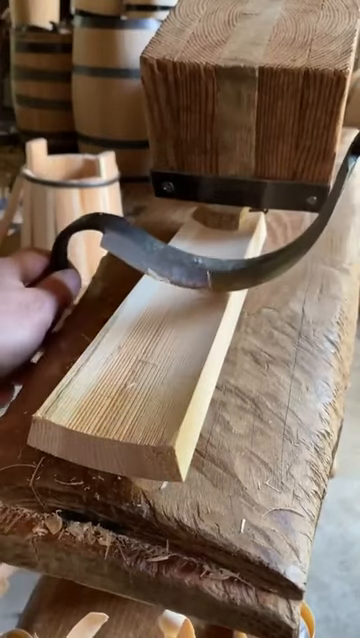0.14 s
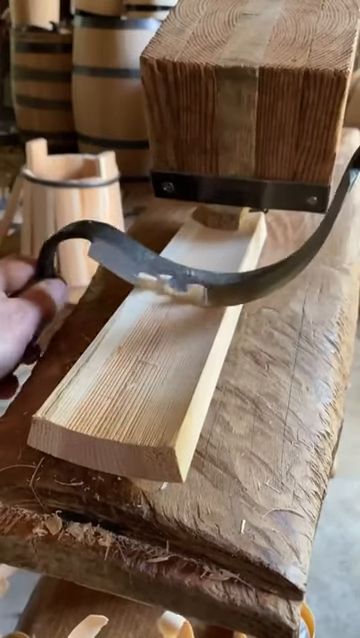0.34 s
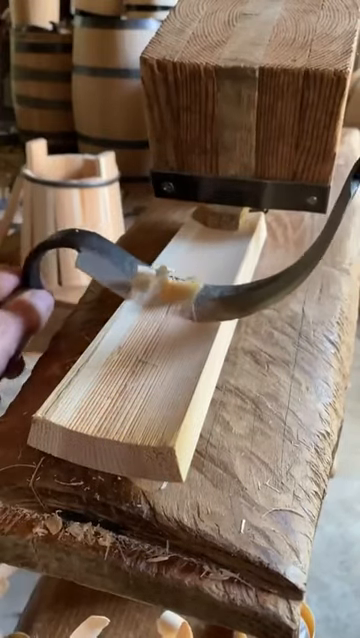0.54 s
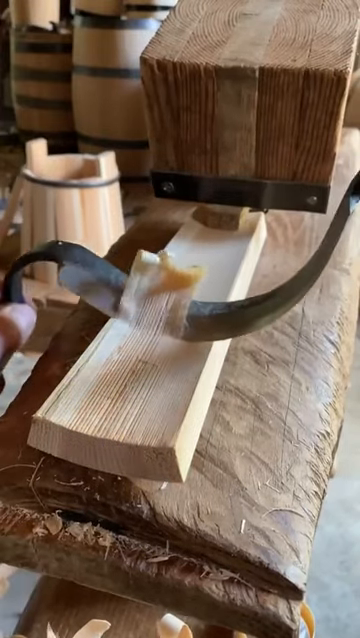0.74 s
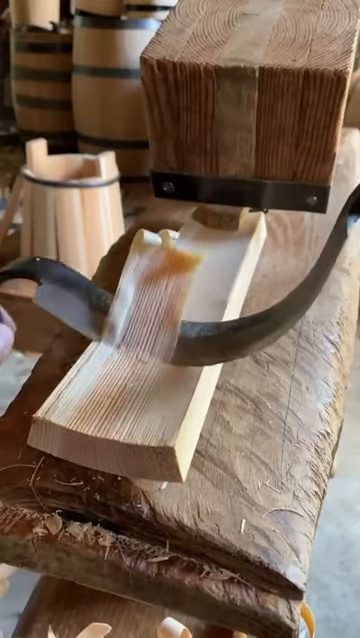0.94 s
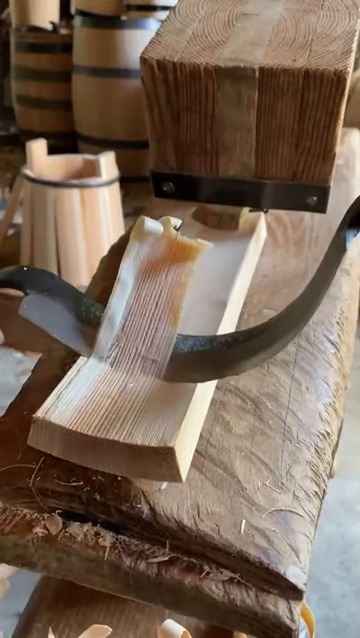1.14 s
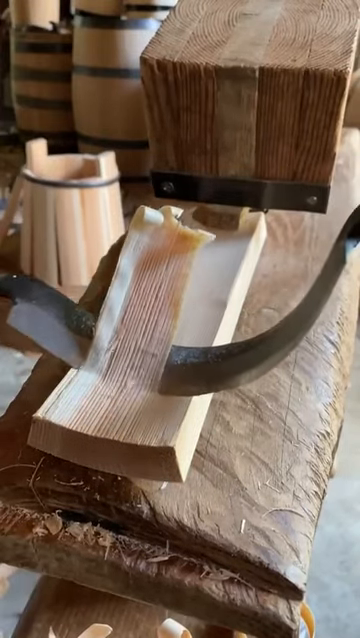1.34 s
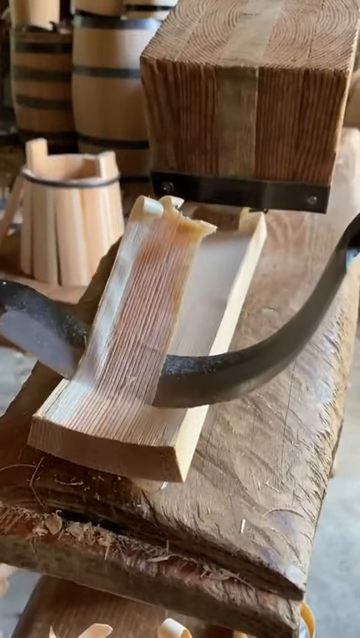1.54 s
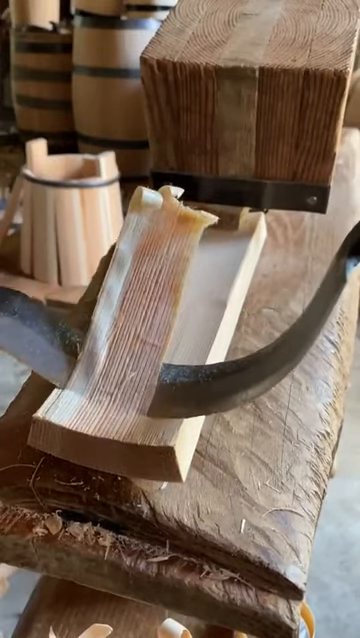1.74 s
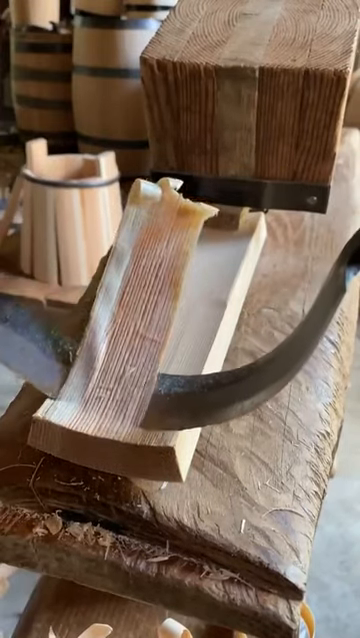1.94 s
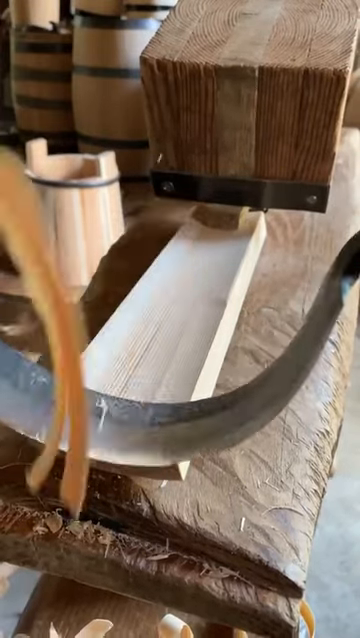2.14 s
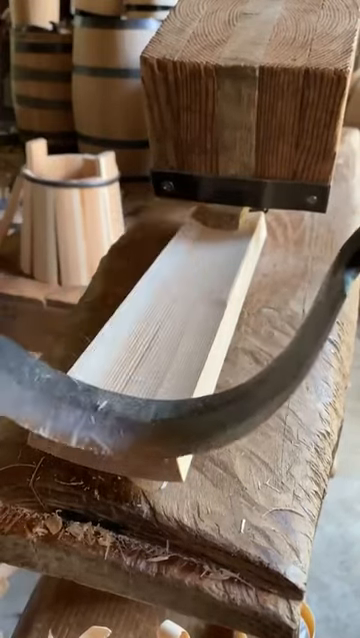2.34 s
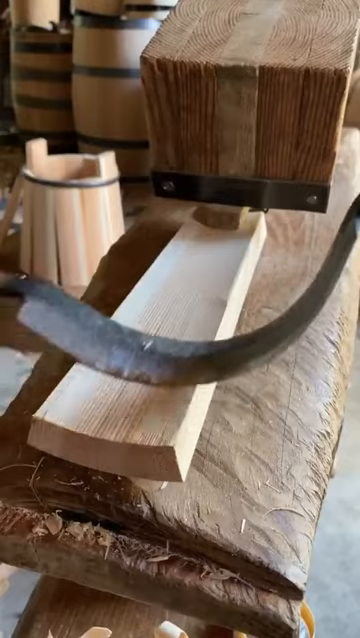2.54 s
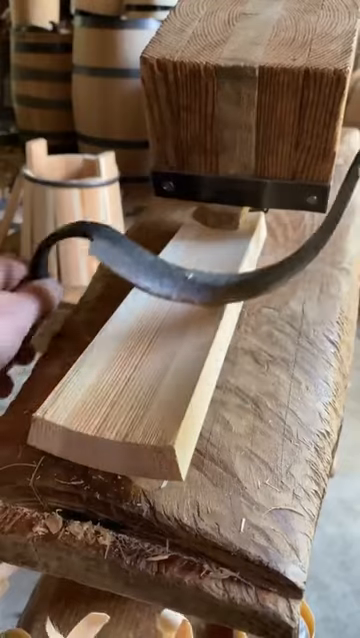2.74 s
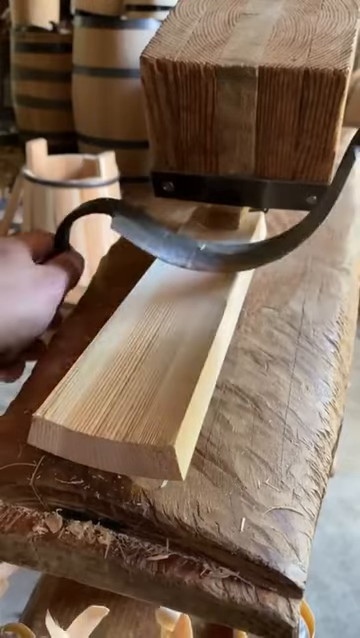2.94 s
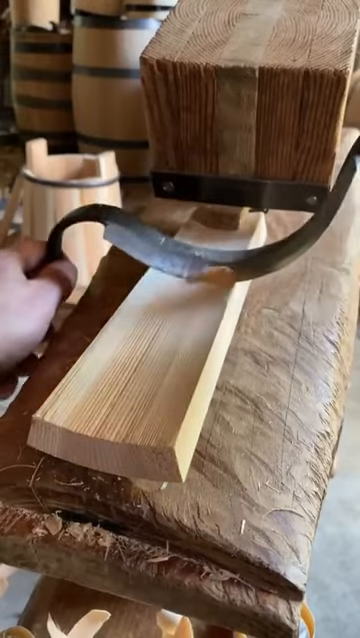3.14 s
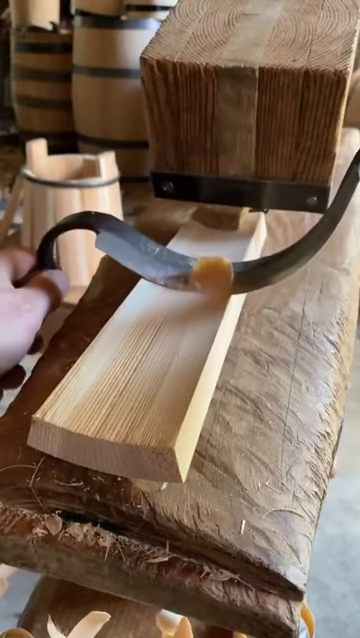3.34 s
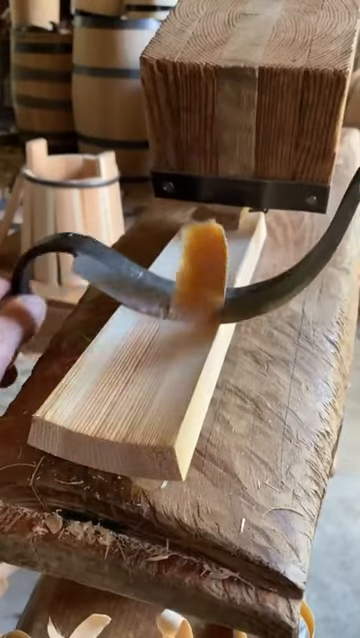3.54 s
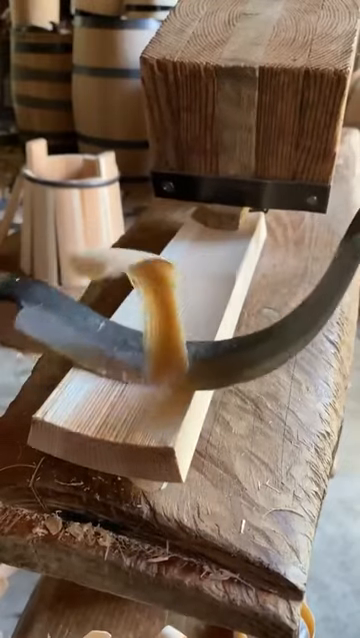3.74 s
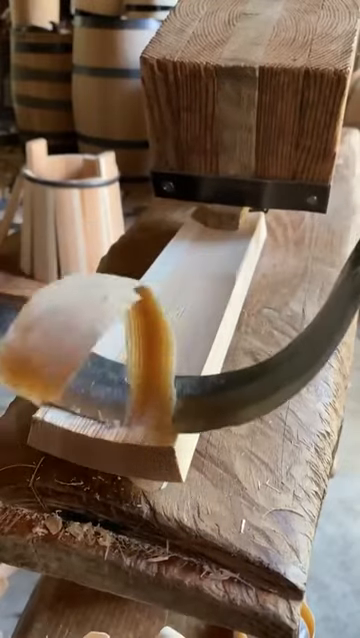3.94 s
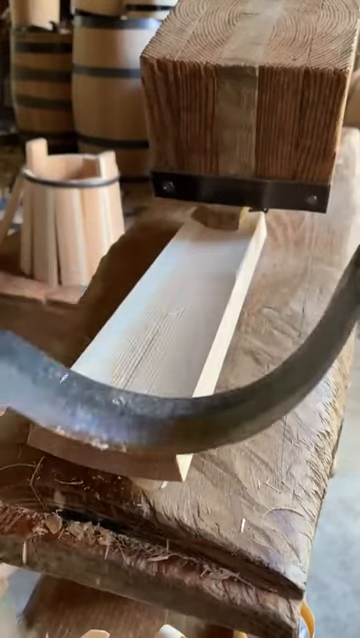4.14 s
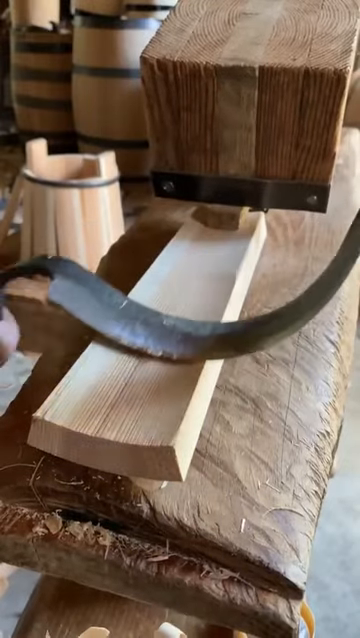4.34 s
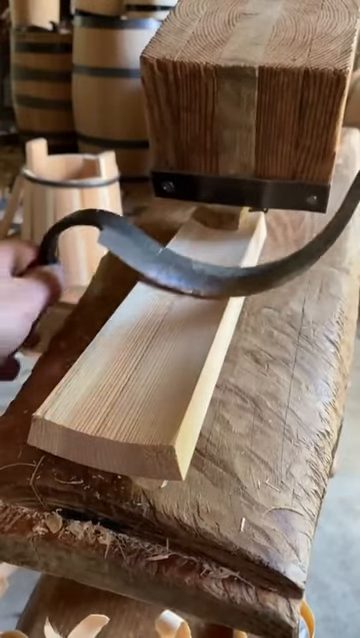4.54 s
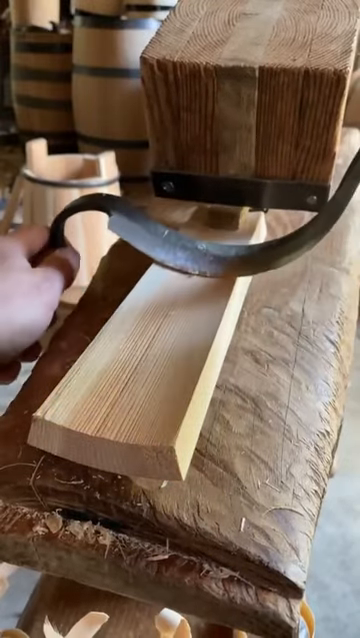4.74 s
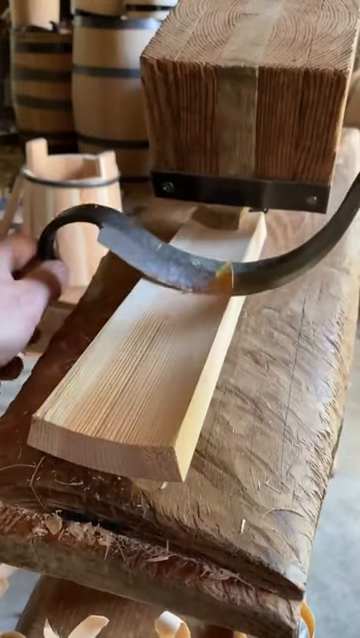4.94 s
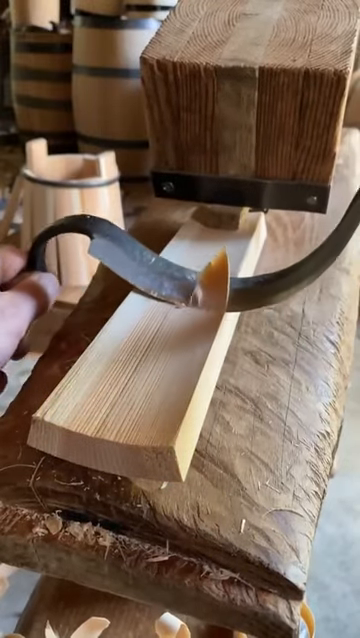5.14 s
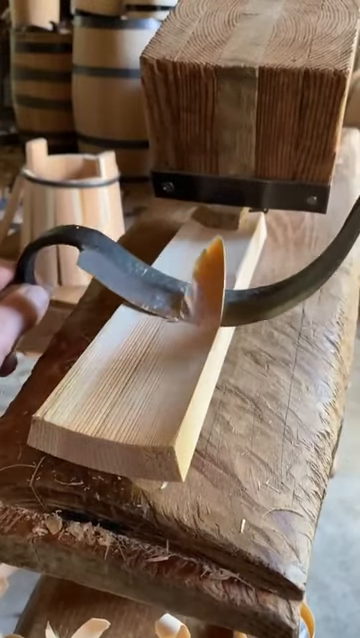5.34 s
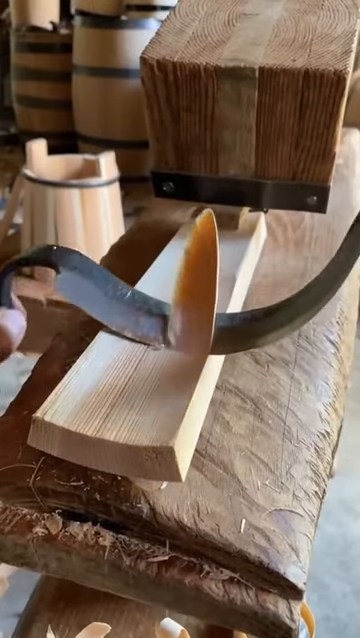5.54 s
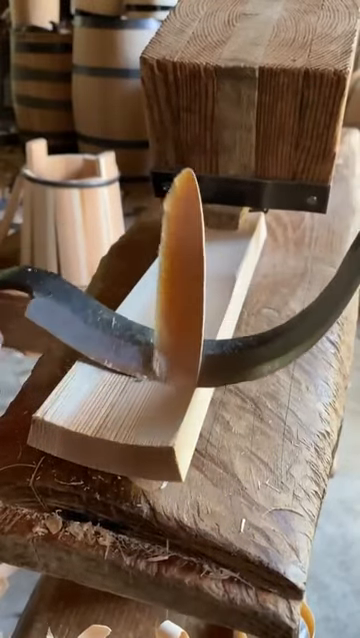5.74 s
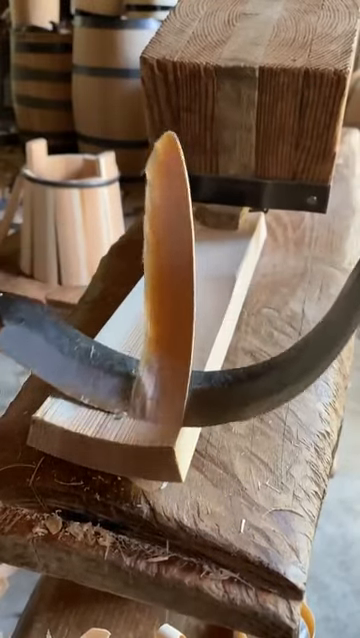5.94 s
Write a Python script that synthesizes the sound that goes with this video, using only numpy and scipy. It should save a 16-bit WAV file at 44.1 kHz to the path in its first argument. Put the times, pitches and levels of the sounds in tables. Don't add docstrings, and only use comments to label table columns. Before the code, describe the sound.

A drawknife pulls three strokes on a board: dry tearing hiss, singing steel and low wooden drone, with knocks as the blade slides back.

```python
import sys
import numpy as np
from scipy import signal
from scipy.fft import rfft, irfft, next_fast_len
from scipy.io import wavfile
from scipy.ndimage import uniform_filter1d

SR = 44100
rng = np.random.default_rng(int(sys.argv[2]) if len(sys.argv) > 2 else 0)


def boost(x):
    u = np.asarray(x, float) / 20
    return 10 ** u


def dump_mix(stems):
    frames = np.atleast_2d(stems).T
    limited = np.clip(frames, -1, 1)
    pcm = np.round(limited * 32767).astype(np.int16)
    wavfile.write(sys.argv[1], SR, pcm)


N = 264159
WIDE = next_fast_len(N, real=True)
TIME = np.arange(N) / SR


def evened(x):
    return x / np.sqrt(np.mean(x ** 2) + 1e-20)


def noise_pair():
    return rng.standard_normal((2, N))


def highpass(x, hz, order):
    return signal.sosfilt(signal.butter(order, hz, "high", fs=SR, output="sos"), x)


def read(points, column=1):
    table, hz = np.transpose(points), np.fft.rfftfreq(WIDE, 1 / SR)
    return np.interp(np.log(hz + 1), np.log(table[0] + 1), table[column])


def colour(x, points):
    hz = np.fft.rfftfreq(WIDE, 1 / SR)
    inside = (hz >= points[0][0]) & (hz <= points[-1][0])
    return evened(irfft(rfft(x, WIDE) * boost(read(points)) * inside, WIDE)[:, :N])


def ring(x, modes, bend=0.96):
    out = 0
    for hz, width, db in modes:
        turn = np.exp(2j * np.pi * np.cumsum(hz * bend * np.ones(x.shape[-1])) / SR)
        r = np.exp(-np.pi * width / SR)
        mode = (turn * signal.lfilter([1 - r], [1, -r], x / turn)).real
        out = out + boost(db) * evened(mode)
    return out


def wobble(seconds, depth_db):
    size = max(int(seconds * SR), 2)
    slow = uniform_filter1d(uniform_filter1d(rng.standard_normal(N), size), size)
    return boost(depth_db * evened(slow))


def shape(s, hold, rise_db_s, fall_db_s):
    t = TIME - s
    db = np.minimum(rise_db_s * t, 0) - fall_db_s * np.maximum(t - hold, 0)
    return boost(2 * np.maximum(db, -100))


# f/Hz, level/dB per Hz
BENCH_RUMBLE = [(15, -59), (25, -20.5), (59, 5.5), (82, 1), (97, -5), (124, -2.5), (156, -10), (220, -16.5),
                (290, -10), (480, -120)]
STILL_AIR = [(120, -11.5), (400, 12), (700, 5.5), (1500, 0), (4000, -2), (8000, -32), (16000, -36.5)]


def shop_air(gain):
    rumble = gain["bench"] * wobble(0.076, 1.0) * colour(noise_pair(), BENCH_RUMBLE)
    return rumble + boost(-62.5) * colour(noise_pair(), STILL_AIR)


# f/Hz, t60/s
SHOP_DECAY = [(200, 0.63), (1000, 0.4), (4000, 0.29), (12000, 0.22)]


def echoes(x):
    taps = rng.choice([-1., 1.], (2, SR // 2)) * (rng.random((2, SR // 2)) < .05)
    taps[:, :200] = 0
    hz, t, z = signal.stft(taps, SR, nperseg=256)
    f, t60 = np.transpose(SHOP_DECAY)
    decay = boost(-60 * t / np.interp(hz, f, t60)[:, None])
    tail = signal.istft(z * decay, SR, nperseg=256)[1]
    return signal.fftconvolve(x, tail / np.linalg.norm(tail[0]), axes=1)[:, :N]


# t/s, level/dB
BENCH_SHOVES = [
    (.86, -45),
    (1.16, -51.5),
    (3.51, -46),
    (5.2, -49),
    (5.68, -41.5),
]


def shove_bench(power):
    power["bench"] += boost(2 * -52.5)
    for s, db in BENCH_SHOVES:
        power["bench"] += boost(2 * db) * shape(s, 0, rise_db_s=48, fall_db_s=90)


# t/s, peak level/dB, f/Hz, t60/s
BOARD_KNOCKS = [(0.628, -30.5, 193, 0.12), (0.882, -29, 460, 0.011), (1, -22, 290, 0.0057),
                (2.447, -45.5, 566, 0.12), (2.824, -42, 238, 0.066), (2.844, -44.5, 396, 0.2),
                (4.349, -28.5, 595, 0.013), (4.504, -26.5, 422, 0.055), (4.518, -40, 374, 0.03),
                (4.569, -37.5, 256.6, 0.21), (4.855, -31.5, 405, 0.031), (5.39, -28, 263, 0.026)]
# t/s, peak level/dB, f/Hz, t60/s
BLADE_TAPS = [
    (4.791, -26.5, 2470, 0.0096),
    (0.037, -44.5, 1190, 0.023),
    (2.449, -26.5, 1160, 0.02),
    (2.449, -33, 1750, 0.013),
    (2.456, -30.5, 1470, 0.028),
    (2.546, -42, 1090, 0.022),
    (2.84, -45, 750, 0.076),
    (4.348, -30.5, 1080, 0.01),
]


def knocks():
    out, t = np.zeros(N + 8192), np.arange(8192) / SR
    for s, db, hz, t60 in BOARD_KNOCKS + BLADE_TAPS:
        at = round(s * SR)
        decay = boost(db - 60 * t / max(t60, .01))
        soft_start = 1 - np.exp(-t * hz * 1.8)
        out[at:at + 8192] += 1.34 * decay * soft_start * np.sin(2 * np.pi * hz * t)
    return np.array([out[:N], np.roll(out[:N], 30)])


# t/s, hold/s, rub level/dB, weight level/dB
BLADE_SLIDES = [(0, 0.033, -52, -51.5), (0.122, 0.27, -55, -70), (2.462, 0.094, -48, -56.5),
                (2.63, 0.18, -60.5, -61), (2.826, 0.015, -55.5, -46), (2.868, 0.064, -55, -67),
                (4.348, 0.037, -56, -48.5), (4.414, 0.077, -67, -48), (4.494, 0.064, -57.5, -47),
                (4.605, 0.12, -62, -63.5), (4.798, 0.056, -69, -55.5)]
FROM_RUB = {"hiss": -.5, "blade": -9, "face": -1.9}
FROM_WEIGHT = {"low": -6.5, "upper": -1, "face": -5.5}


def slide_back(power):
    for s, hold, rub_db, weight_db in BLADE_SLIDES:
        slide = shape(s, hold, rise_db_s=800, fall_db_s=170)
        power["bright"] += -13 * boost(2 * (rub_db + FROM_RUB["hiss"])) * slide
        for level_db, law in ((rub_db, FROM_RUB), (weight_db, FROM_WEIGHT)):
            for layer, more_db in law.items():
                power[layer] += boost(2 * (level_db + more_db)) * slide


# t/s, peak level/dB, t60/s, brightness/dB, thud level/dB
SHAVING_TEARS = [
    (2.195, -25.5, 0.17, -1, -54),
    (4.119, -30.5, 0.097, 12.5, -41.5),
]


def tear_off(power):
    rise_db_s, thud_lag_s = 496.5, 0.015
    for s, peak_db, t60, bright_db, thud_db in SHAVING_TEARS:
        tear = shape(s, 0, rise_db_s, 60 / t60)
        thud = shape(s + thud_lag_s, 0, rise_db_s, 60 / t60)
        power["hiss"] += boost(2 * peak_db) * tear
        power["bright"] += bright_db * boost(2 * peak_db) * tear
        power["blade"] += boost(2 * (peak_db - 21)) * tear
        power["face"] += boost(2 * (peak_db - 16)) * thud
        power["low"] += boost(2 * thud_db) * thud


# t/s, peak level/dB, centre f/Hz
FIBRE_SNAPS = [(0.612, -46, 2500), (0.672, -43, 3600), (0.8835, -28.5, 5600), (1, -31, 5240),
               (1.1, -34, 4880), (1.1163, -33.5, 4500), (1.1608, -28.5, 4580), (1.1788, -24.5, 3160),
               (1.3418, -37.5, 2900), (1.5212, -32, 3500), (1.6402, -35.5, 2980), (1.6868, -52, 2650),
               (1.783, -41, 7500), (1.941, -39, 3100), (3.5536, -38.5, 2720), (3.5813, -33, 4950),
               (5.1248, -35, 5800), (5.1743, -34.5, 6100), (5.224, -39, 6100), (5.3592, -39, 6860),
               (5.3759, -33, 5800), (5.3941, -26, 5700), (5.301, -36.5, 3000), (5.51, -40.5, 5240),
               (5.5468, -34, 4100), (5.5657, -40, 3280), (5.602, -34, 5170), (5.622, -37, 5740),
               (5.7393, -31, 6200), (5.8518, -25.5, 6100)]
# t/s, peak level/dB, centre f/Hz
SHAVING_RIPS = [(2.153, -36.5, 5790), (2.1622, -50.5, 5000), (2.174, -25.5, 5770), (2.1817, -13.5, 6100),
                (2.189, -16.5, 4780), (2.201, -21, 5350), (2.2165, -22, 4410), (4.109, -41, 7780),
                (4.115, -26, 5430), (4.117, -15, 7790), (4.1235, -33, 8060), (4.1356, -24, 3416)]
# t/s, peak level/dB, centre f/Hz
STEEL_TICKS = [(0.0368, -41, 3710), (0.0785, -45, 4560), (2.4463, -37.5, 2720), (2.457, -39.5, 2670),
               (2.5257, -44, 3300), (2.5466, -36, 3330), (2.6173, -48.5, 5570), (2.8006, -51, 4930),
               (2.825, -51, 4440), (3.1363, -53, 2350), (4.3504, -43.5, 2850), (4.5326, -53.5, 2520),
               (4.7909, -37, 2440)]


def snaps():
    out, t = np.zeros((2, N + 2048)), np.arange(2048) / SR
    for s, db, hz in FIBRE_SNAPS + SHAVING_RIPS + STEEL_TICKS:
        t60 = 0.017 * np.exp(-0.0746 * (db + 34))
        soft_start = 1 - np.exp(-(t / 0.00031) ** 2)
        burst = rng.standard_normal((2, 2048)) * soft_start * boost(-60 * t / max(t60, .004))
        band = signal.butter(2, [1050, 1.95 * hz + 1500], "band", fs=SR, output="sos")
        broad = signal.sosfilt(band, burst)
        pair = .7 * evened(broad) + ring(burst, [(hz, .4 * hz, 0)])
        pair = highpass(pair, 750, order=3)
        loudest = np.sqrt(uniform_filter1d(pair[0] ** 2, size=100).max())
        at = round((s - .0004) * SR)
        out[:, at:at + 2048] += boost(db + 1.5) * pair / loudest
    return out[:, :N]


# f/Hz, width/Hz, level/dB
BOARD_LOW = [(202, 30, 5.5), (204.7, 55, 6), (238.7, 19, 5.5)]
BOARD_UPPER = [(349, 8.7, 4), (379.6, 7.1, -3), (461, 6.5, -6), (640, 370, 2.5)]


def board(gain):
    chatter = wobble(0.014, 2.2) * noise_pair()
    low = ring(ring(chatter, BOARD_LOW), [(216.4, 83, 0)])
    upper = ring(ring(chatter, BOARD_UPPER), [(370, 380, 0)])
    return gain["low"] * evened(low) + gain["upper"] * evened(upper)


def tearing(per_s, spread_db, burst_s, share):
    strength = boost(spread_db * np.minimum(rng.exponential(1, N), 2.8))
    breaks = (rng.random(N) < per_s / SR) * strength
    bursts = signal.lfilter([1], [1, -np.exp(-1 / (burst_s * SR))], breaks)
    envelope = np.sqrt(1 - share + share * evened(bursts) ** 2)
    return envelope * wobble(0.00377, 0.29) * wobble(0.01, 0.33) * noise_pair()


def patchy(x, depth_db):
    z = signal.stft(x, nperseg=512)[2]
    field = uniform_filter1d(rng.standard_normal(z.shape[1:]), size=3, axis=0)
    field = uniform_filter1d(field, size=16, axis=1)
    return evened(signal.istft(z * boost(depth_db * evened(field)), nperseg=512)[1][:, :N])


# f/Hz, width/Hz, level/dB
SHAVING_NOTES = [(3500, 42, -28.5), (4500, 690, -11.5), (5610, 120, -18), (6100, 490, -6.5), (8190, 73, -5)]
# f/Hz, level/dB per Hz
FIBRE_HISS = [(1000, -14), (1500, -5.5), (2200, -5), (2600, 5.5), (3300, 3.5), (6000, -1), (7500, -3.5),
              (9000, -5), (11000, -15), (12800, -7), (16500, -39)]
BOARD_FACE = [(250, -1.5), (420, 4.5), (521, -18.5), (756, -6.5), (856, 7), (1150, -11), (2000, -5.5),
              (2600, -55.5), (4400, -120)]
BLADE_NOTES = (2284, 2037, 2235, 1780)
# width/Hz, level/dB
BLADE_RING = [(48, 5.5), (60, -1), (70, 3.5), (90, -8)]


def edge(gain):
    drive = tearing(per_s=320, spread_db=5.0, burst_s=.0012, share=0.26)
    hiss = patchy(colour(drive + 0.29 * ring(drive, SHAVING_NOTES), FIBRE_HISS), depth_db=2.8)
    hiss = hiss + (gain["top"] - 1) * highpass(hiss, 7500, order=2)
    notes = [(hz, *how) for hz, how in zip(BLADE_NOTES, BLADE_RING)]
    blade = evened(ring(drive, notes, bend=wobble(.05, .06)))
    face = colour(drive, BOARD_FACE)
    return (boost(-1.0) * gain["hiss"] * hiss + boost(-4.0) * gain["blade"] * blade
            + boost(-6.0) * gain["face"] * face)


def columns(tables):
    bite_s, lift_s, clear_db, unloaded_db = 0.078, 0.051, -26.5, -35
    padded = []
    for c in tables:
        before = np.add(c[0], [-bite_s, clear_db, unloaded_db])
        after = np.add(c[-1], [lift_s, clear_db, clear_db])
        padded.append(np.vstack([before, c, after]))
    s, *cols = np.vstack(padded).T
    return [np.interp(TIME, s, c) for c in cols]


# t/s, speed of the cut level/dB, load of the edge on the board level/dB
PULLS = [
    [(.29, -44, -38.5), (.38, -39.5, -41), (.54, -42, -45.5), (.72, -38.5, -49), (.9, -38, -45.5),
     (1.25, -40.5, -53), (1.7, -44, -64), (1.98, -42, -54), (2.13, -47.5, -65)],
    [(3.16, -53, -43), (3.2, -46, -35), (3.4, -45, -40), (3.52, -41, -42), (3.67, -35.5, -36),
     (3.85, -37, -46), (3.98, -41, -45), (4.1, -39.5, -50.5)],
    [(4.92, -52.5, -38), (4.99, -41, -32.5), (5.1, -46.5, -35.5), (5.19, -41, -41.5), (5.35, -48, -45.5),
     (5.6, -41.5, -42.5), (5.82, -41.5, -45), (5.89, -37.5, -42), (5.99, -39.5, -47.5)],
]
# level/dB at the bite, level/dB at the end
GRIP = [
    (1.5, -3.5),
    (1, 2.5),
    (2.5, 5),
]
FROM_PULL = {"hiss": (-46, 1, 0), "blade": (-49, 0.72, 0.36), "face": (-58, 0.41, 0.27),
             "low": (-45.5, 0, 0.98), "upper": (-54.5, 0.54, 0.71), "bench": (-56, 0.37, .2),
             "bright": (1, 1, -0.076)}


def pull():
    speed, load = columns(PULLS)
    usual_db = -45
    db = {}
    for layer, (at, by_speed, by_load) in FROM_PULL.items():
        db[layer] = at + by_speed * (speed - usual_db) + by_load * (load - usual_db)
    bright = np.clip(db.pop("bright"), -25, 12)
    grip_s = [c[k][0] for c in PULLS for k in (0, -1)]
    db["blade"] += np.interp(TIME, grip_s, np.ravel(GRIP))
    power = {layer: boost(2 * v) for layer, v in db.items()}
    power["bright"] = bright * power["hiss"]
    return power


def drives():
    power = pull()
    shove_bench(power)
    tear_off(power)
    slide_back(power)
    top = boost(power.pop("bright") / power["hiss"])
    return {"top": top, **{layer: np.sqrt(v) for layer, v in power.items()}}


def scene():
    gain = drives()
    near = knocks() + snaps() + board(gain) + edge(gain)
    return shop_air(gain) + boost(-14) * echoes(near) + near


# f/Hz, level/dB
GAP_LEVEL = [(60, -38), (98, -22.5), (160, -13.5), (260, -11), (430, -8), (700, 0.5), (1150, -4),
             (1890, -11), (3090, -0.5), (5050, -1), (8270, 6.5), (13500, 3)]
# f/Hz, tied share, phase/radians
GAP_TIE = [(60, .3, -2.5), (198, 1, 0.5), (430, 0.41, 0.1), (800, .3, 2.5), (2210, 0.067, -2),
           (5000, 0.068, 2.5), (12000, 0.42, 1.4)]


def two_ports(dry):
    total, twin = rfft(dry, WIDE)
    tie = np.clip(read(GAP_TIE), 0, 1)
    tied = tie * np.exp(1j * read(GAP_TIE, column=2)) * total
    gap = boost(read(GAP_LEVEL)) * (tied + np.sqrt(1 - tie ** 2) * twin)
    return irfft(np.array([total, gap]), WIDE)[:, :N]


# f/Hz, share of the time in the sum, share in the difference
BAND_GAPS = [(1054, 0.028, 0.011), (1575, 0.17, 0.375), (2320, 0.0097, .03), (2540, 0.35, 0.12),
             (3230, 0.25, 0.028), (4830, 0.17, .07), (7100, 0.081, 0.084), (8430, 0.28, 0.12),
             (11200, 0.29, 0.016), (13300, 0.11, 0.006)]


def thin_out(pair):
    hz, t, z = signal.stft(pair, SR, nperseg=1024, noverlap=768)
    band = np.where(hz < 7700, hz / 172, 50 + hz / 690).astype(int)
    luck = uniform_filter1d(rng.standard_normal((2, band.max() + 1, len(t))), size=15, axis=2)
    luck = 1 / (1 + np.exp(-1.7 * evened(luck)))[:, band]
    table = np.transpose(BAND_GAPS)
    share = np.array([np.interp(hz, table[0], c) for c in table[1:]])[..., None] * np.ones(len(t))

    span = round(.028 / t[1])
    treble = (abs(z[:, hz > 3000]) ** 2).sum((0, 1))
    now_db = 10 * np.log10(uniform_filter1d(treble, size=7) + 1e-20)
    lull_db = uniform_filter1d(now_db, size=4 * span) - now_db
    bass = (abs(z[0, (hz > 120) & (hz < 500)]) ** 2).sum(0)
    bass_db = 10 * np.log10(uniform_filter1d(bass, size=7) + 1e-20)
    lull_db += .2 * (bass_db - uniform_filter1d(bass_db, size=8 * span))
    spell = uniform_filter1d(rng.standard_normal(len(t)), size=span)
    spell = evened(uniform_filter1d(spell, size=span))
    dryness = np.clip(lull_db + 1.8 * spell + .4, 0, 1)
    share[0] += dryness * np.interp(hz, [7300, 7800, 9000, 11700, 12000], [0, .65, .9, .9, .45])[:, None]
    share[0] += .55 * (treble < .12 * np.median(treble)) * (hz > 7800)[:, None]
    share[:, hz < 1200] = 0

    sudden = treble > boost(2 * 5.5) * (np.roll(treble, 5) + 1e-20)
    share[:, hz < 7300] *= ~(sudden | np.roll(sudden, 2) | np.roll(sudden, -2))
    top = sudden * boost(np.interp(hz, [13000, 16500], [-6, -40]))[:, None]
    faint = abs(z) < .55 * uniform_filter1d(abs(z), size=9, axis=1) * (hz > 1200)[:, None]
    keep = ~faint * (luck > share) * np.where((hz < 13250)[:, None], 1, top)
    return signal.istft(z * keep, SR, nperseg=1024, noverlap=768)[1][:, :N]


def top_cut(x):
    return signal.sosfilt(signal.butter(12, 14140, fs=SR, output="sos"), x)


def record(dry):
    total, gap = thin_out(two_ports(dry))
    ceiling = .8
    mix = ceiling * np.tanh(np.array([total + gap, total - gap]) / ceiling)
    return top_cut(mix)


dry = scene()
out = record(dry)
dump_mix(out)
```